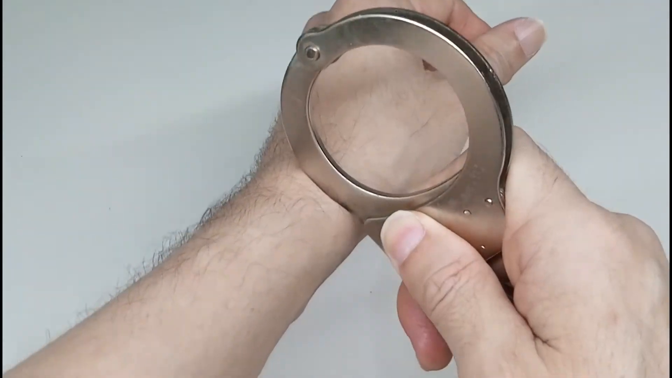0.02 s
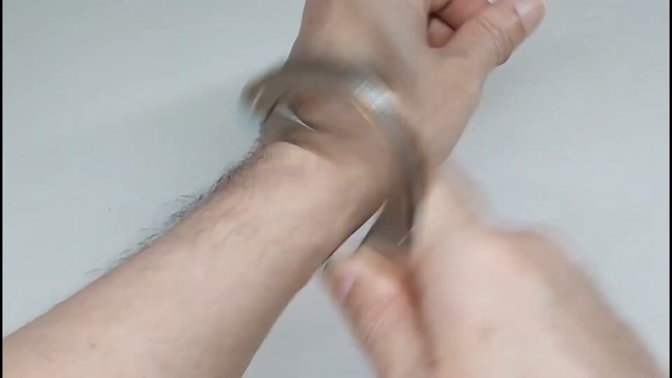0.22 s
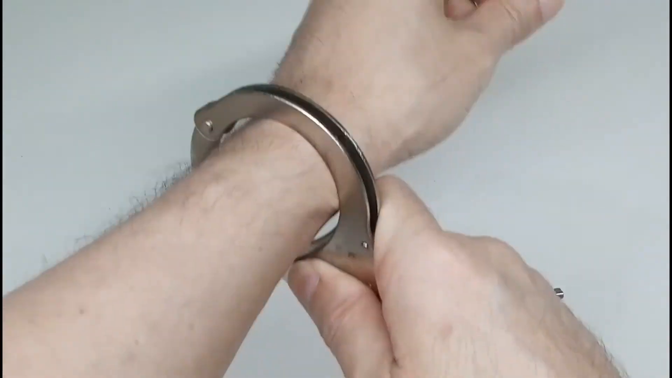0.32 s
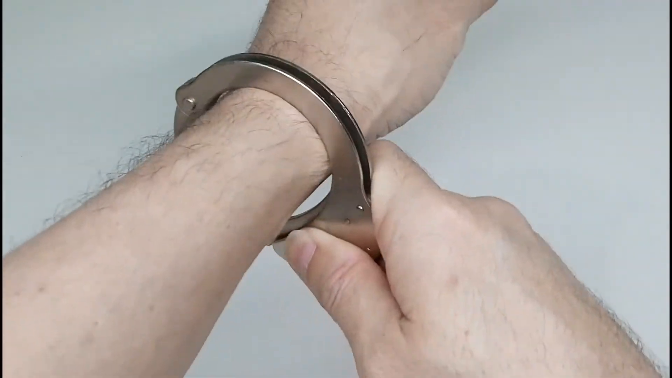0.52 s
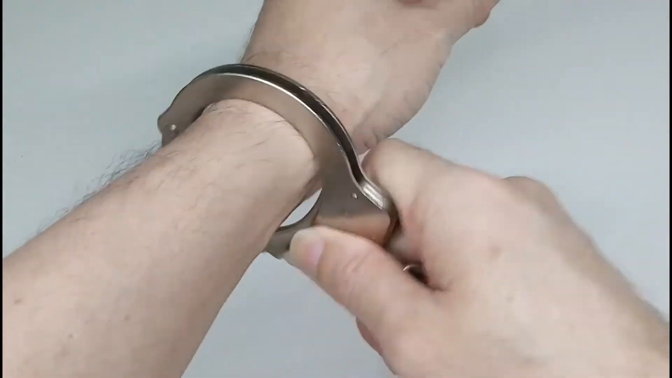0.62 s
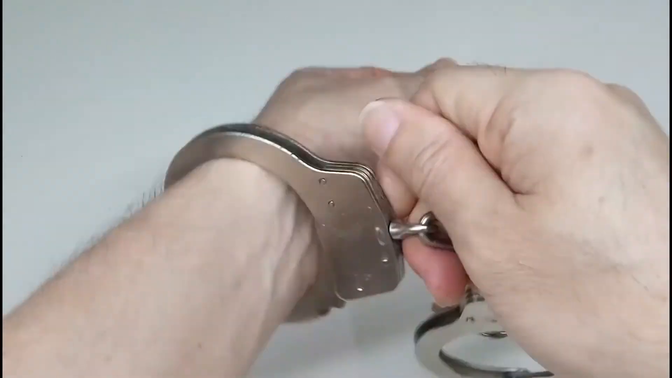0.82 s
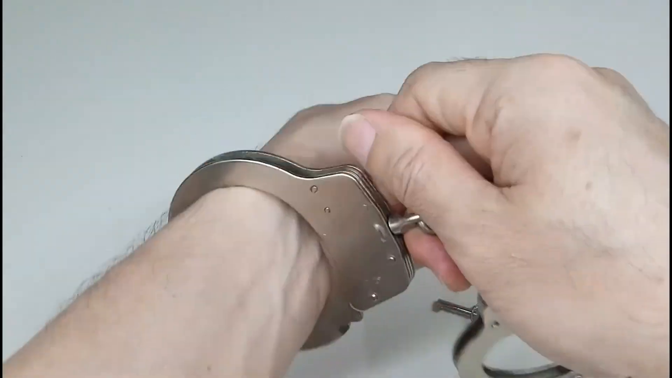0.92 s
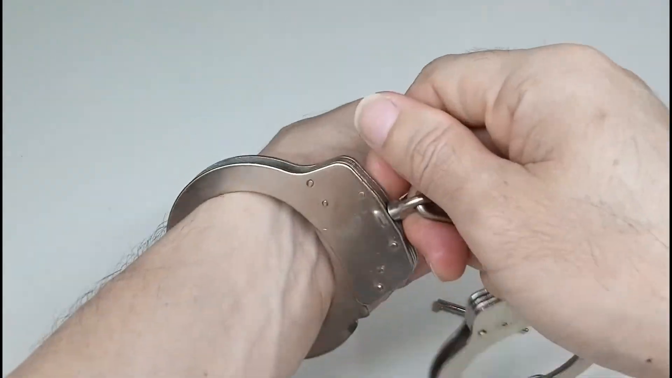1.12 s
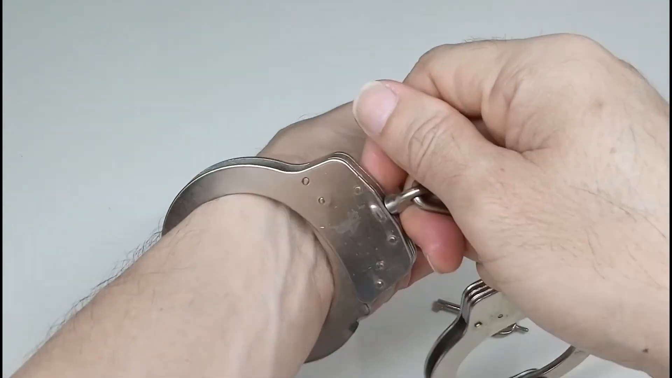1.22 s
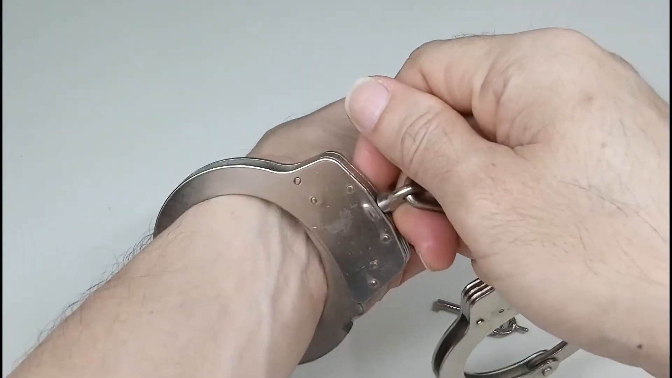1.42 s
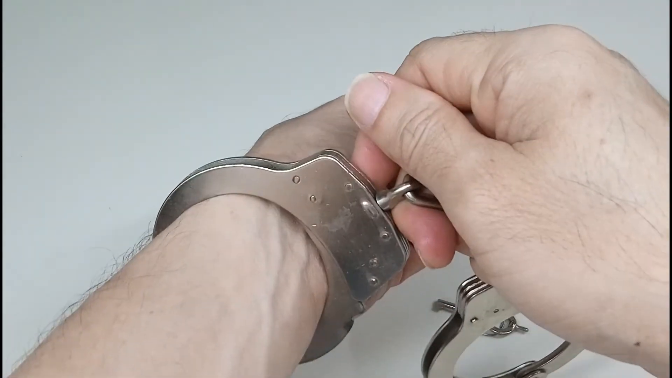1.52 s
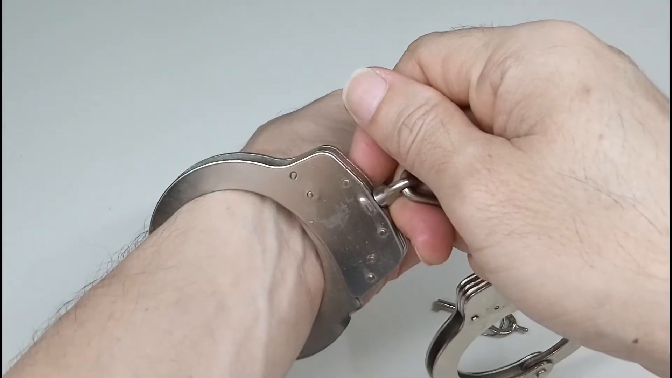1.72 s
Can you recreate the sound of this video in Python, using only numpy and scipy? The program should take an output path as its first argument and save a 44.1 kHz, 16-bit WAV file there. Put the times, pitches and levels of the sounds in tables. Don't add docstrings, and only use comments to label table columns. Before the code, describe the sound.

A steel handcuff snaps shut on a wrist with a quick metallic rattle and bright clack

```python
import sys
import numpy as np
from scipy import signal
from scipy.fft import rfft, irfft
from scipy.io import wavfile
from scipy.ndimage import uniform_filter1d

SR = 44100
rng = np.random.default_rng(int(sys.argv[2]) if len(sys.argv) > 2 else 0)


def to_wav(s):
    ch = np.atleast_2d(s).T
    pcm = np.round(np.clip(ch, -1, 1) * 32767)
    wavfile.write(sys.argv[1], SR, pcm.astype(np.int16))


def natural_amplitude(level_db):
    exponent = np.asarray(level_db, float) / 20
    return 10 ** exponent


N = 79380

# start in seconds [s], level in dB [dB].
RATTLE_CONTACTS = [(.2418, -41), (.2432, -25.5), (.2448, -23.5), (.247, -25), (.2492, -20), (.2512, -17.5),
                   (.2545, -20), (.2565, -26.5), (.26, -18.5), (.262, -29), (.2665, -31), (.27, -54),
                   (.279, -38)]
STRIKE_CONTACTS = [(.29, -19.5), (.2915, -14), (.2945, -13.5), (.2968, -18), (.2995, -19), (.302, -29.5),
                   (.3045, -29.5), (.3068, -15), (.3094, -29), (.313, -37), (.316, -24)]
CATCH_CONTACTS = [(.3254, -20.5), (.3266, -15), (.3286, -14.5), (.3304, -11.5), (.3332, -18), (.3345, -28),
                  (.3365, -28), (.338, -40.5), (.3402, -32), (.3455, -23), (.348, -25)]
SOFT_TICK_CONTACTS = [
    (.711, -61),
    (.714, -49),
]
TICK_CONTACTS = [
    (.856, -44),
    (.861, -46),
]
# start in seconds [s], level in dB [dB].
FRAME_CONTACTS = [
    (.331, -35.5),
]
WRIST_CONTACTS = [
    (.29, -22.5),
]
PALM_CONTACTS = [
    (0.328, -32.5),
]
KNUCKLE_CONTACTS = [
    (.248, -30),
]

# frequency in Hz [Hz], level in dB [dB], t60 in seconds [s].
CHAIN_MODES = [(1900, -15, .02), (2550, -8, .025), (2925, -7, .03), (3440, -3, .03), (4170, 0, .035),
               (4390, -4, .03), (4900, -4, .025), (5530, -4, .03), (6060, -6, .025), (6850, -12, .02),
               (7920, -17, .015), (10300, -17, .012), (14650, -15, .015)]
BOW_MODES = [(2080, -20, .03), (3050, -13, .03), (3570, -2, .035), (3750, 0, .035), (3970, -7, .03),
             (4190, -10, .03), (4940, -12, .02), (5400, -14, .02), (6410, -16, .02), (6940, -18, .02),
             (10000, -27, .03), (14800, -21, .03)]
PAWL_MODES = [(2150, -9, .012), (2480, -6, .012), (2760, -2, .015), (3190, -5, .014), (3630, 0, .018),
              (4175, -5, .02), (4620, -10, .015), (5240, -7, .02), (5560, -11, .015), (6500, -17, .012),
              (9250, -19, .04), (11600, -23, .015), (13630, -20, .04), (14900, -13, .015)]
SOFT_LINK_MODES = [(2150, -2, 0.022), (2920, 0, 0.018), (4480, -2, 0.031)]
LINK_MODES = [(4420, 3.5, 0.01), (4940, -3.5, 0.016), (5340, -6, 0.016), (6150, -7, 0.018)]
FRAME_MODES = [(2720, -8, .2), (3187, -10, .2), (3592, -6, .33), (3668, 0, .45), (3742, -6, .3),
               (4050, -8, .35), (4820, -12, .3), (5228, -7, .2), (5520, -12, .2), (7300, -16, .27),
               (9220, -19, .3), (9290, -19, .3), (13630, -21, .27), (14410, -22, .17)]
# frequency in Hz [Hz], level in dB [dB], t60 in seconds [s].
WRIST_MODES = [(238, 0, .07), (425, 0, .045), (740, -5, .03), (1135, -6, .035)]
PALM_MODES = [(155, 0, .07), (410, -4, .04), (520, -5, .04), (870, -5, .04)]
KNUCKLE_MODES = [(520, -5, .05), (895, 0, .07)]

# frequency in Hz [Hz], density in dB per Hz [dB].
CRACK_SPECTRUM = [(500, -21.5), (1400, -23), (2300, -13.5), (3900, -5.5), (6500, -11), (8000, -21),
                  (13000, -21.5), (15000, -16)]
# frequency in Hz [Hz], t60 in seconds [s].
ROOM_DECAY = [(300, 0.21), (2000, 0.25), (5000, 0.42), (10000, 0.3), (15000, .25)]
# frequency in Hz [Hz], density in dB per Hz [dB].
AIR_SPECTRUM = [(25, -27), (70, -6), (170, -12.5), (800, -17), (2200, -26), (6500, -36.5), (8300, -49),
                (13000, -50)]
# time in seconds [s], level in dB [dB].
AIR_DRIFT = [(0, 0.5), (.6, 0.33), (1.2, .5), (1.4, 0.1), (1.8, -0.24)]
# frequency in Hz [Hz], width in Hz [Hz], level in dB [dB].
DUCT_RESONANCES = [(209, 17, -62), (290, 23, -63.5), (423.5, 10, -69.5), (480, 40, -64.5), (797, 120, -62)]

STEEL_RISE_T60_S, FLESH_RISE_T60_S = 0.0013, 0.015
BOUNCE_GAP_S, BOUNCE_DB = 0.00093, -3.5
CRACK_T60_S, CRACK_RISE_S = 0.013, 0.00082
MODE_SCATTER_DB = 1.5
HUM_HZ, HUM_WIDTH_HZ = 101.3, 15


def level(x, db):
    return x * natural_amplitude(db) / np.sqrt(np.mean(x ** 2))


def colour(x, points):
    hz, db = np.array(points).T
    f = np.arange(len(x) // 2 + 1) * SR / len(x) + 1
    gain = natural_amplitude(np.interp(np.log(f), np.log(hz), db))
    return irfft(rfft(x) * gain, len(x))


def decay_pole(t60):
    return np.exp(-np.log(1000) / (t60 * SR))


def ring(x, hz, t60):
    pole = decay_pole(t60) * np.exp(2j * np.pi * hz / SR)
    return signal.lfilter([1], [1, -pole], x).imag


def contact_pushes(contacts, bounces):
    push = np.zeros((len(contacts), N))
    for k, (start, db) in enumerate(contacts):
        push[k, int(start * SR)] = natural_amplitude(db)
        times = start + BOUNCE_GAP_S * np.cumsum(rng.exponential(1, bounces))
        loss_db = BOUNCE_DB * np.arange(1, bounces + 1)
        np.add.at(push[k], (times * SR).astype(int), natural_amplitude(db + loss_db))
    return push


def ring_modes(push, modes, rise_t60):
    out = np.zeros(N)
    for hz, db, t60 in modes:
        sign = np.sign(rng.standard_normal(len(push)))
        strength = natural_amplitude(MODE_SCATTER_DB * rng.standard_normal(len(push)))
        z = ring((sign * strength) @ push, hz, t60)
        z = ring(z, hz, rise_t60)
        energy = np.sum(push ** 2) * t60 * SR / (4 * np.log(1000))
        out += natural_amplitude(db) * z * np.sqrt(energy / np.sum(z ** 2))
    return out


def crack(push):
    fade = signal.lfilter([1], [1, -decay_pole(CRACK_T60_S)], push.sum(axis=0))
    rise = 1 / (CRACK_RISE_S * SR)
    fade = signal.lfilter([rise], [1, rise - 1], fade)
    return fade * level(colour(rng.standard_normal(N), CRACK_SPECTRUM), 0)


def hits(contacts, modes, crack_db, rise_t60=STEEL_RISE_T60_S, bounces=1):
    push = contact_pushes(contacts, bounces)
    return ring_modes(push, modes, rise_t60) / 2 + natural_amplitude(crack_db) * crack(push)


def cuff_steel():
    rattle = hits(RATTLE_CONTACTS, CHAIN_MODES, crack_db=-5.5)
    strike = natural_amplitude(-0.5) * hits(STRIKE_CONTACTS, BOW_MODES, crack_db=-12)
    catch = natural_amplitude(0.54) * hits(CATCH_CONTACTS, PAWL_MODES, crack_db=-9.5)
    soft_tick = hits(SOFT_TICK_CONTACTS, SOFT_LINK_MODES, crack_db=-20)
    tick = hits(TICK_CONTACTS, LINK_MODES, crack_db=-21)
    return rattle + strike + catch + soft_tick + tick


def cuff_frame():
    return hits(FRAME_CONTACTS, FRAME_MODES, crack_db=-47)


def flesh():
    soft = dict(crack_db=-22, rise_t60=FLESH_RISE_T60_S, bounces=0)
    wrist = hits(WRIST_CONTACTS, WRIST_MODES, **soft)
    palm = hits(PALM_CONTACTS, PALM_MODES, **soft)
    knuckle = hits(KNUCKLE_CONTACTS, KNUCKLE_MODES, **soft)
    return wrist + palm + knuckle


def band_noise(low_hz, high_hz, count):
    sos = signal.butter(2, [low_hz, high_hz], "band", fs=SR, output="sos")
    return signal.sosfilt(sos, rng.standard_normal(count))


def room(x):
    t = np.arange(SR // 2) / SR
    hz, t60 = np.array(ROOM_DECAY).T
    tail = np.zeros(len(t))
    for f in 150 * 2 ** np.arange(0, 7, .5):
        band = band_noise(f * 2 ** -.25, f * 2 ** .25, len(t))
        tail += band * natural_amplitude(-60 * t / np.interp(np.log(f), np.log(hz), t60))
    tail *= np.clip(t / 0.004, 0, 1)
    tail /= np.sqrt(np.sum(tail ** 2))
    return natural_amplitude(-11.5) * signal.fftconvolve(x, tail)[:N]


def resonance(hz, width_hz, db):
    t60 = np.log(1000) / np.pi / width_hz
    return level(ring(rng.standard_normal(N), hz, t60), db)


def ventilation():
    k = SR // 6
    swell = uniform_filter1d(np.repeat(rng.standard_normal(N // k + 1), k), k)[:N]
    flow = level(colour(rng.standard_normal(N), AIR_SPECTRUM), -53.5)
    flow += sum(resonance(*row) for row in DUCT_RESONANCES)
    drift_db = np.interp(np.arange(N) / SR, *np.array(AIR_DRIFT).T)
    return flow * natural_amplitude(-0.3 * swell + drift_db)


def hum():
    tone = np.sin(2 * np.pi * HUM_HZ * np.arange(N) / SR)
    return resonance(HUM_HZ, HUM_WIDTH_HZ, -60.5) + level(tone, -60.5)


def microphone_hiss():
    return level(band_noise(14450, 15350, N), -79)


def scene():
    close = cuff_steel() + flesh()
    background = ventilation() + hum() + microphone_hiss()
    return (close + cuff_frame() + room(close) + background)[None]


def roll_off(x):
    return signal.sosfilt(signal.butter(12, 16180, fs=SR, output="sos"), x)


def record(dry):
    top_cut = signal.ellip(8, .2, 36, 15420, fs=SR, output="sos")
    return roll_off(signal.sosfilt(top_cut, dry))


dry = scene()
out = record(dry)
to_wav(out)
```